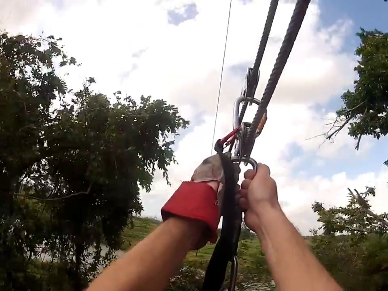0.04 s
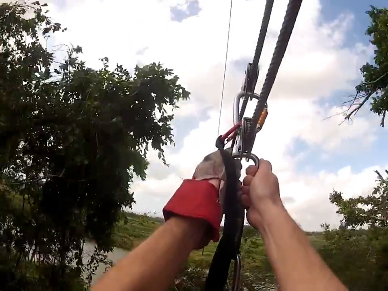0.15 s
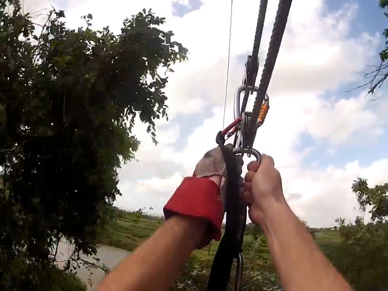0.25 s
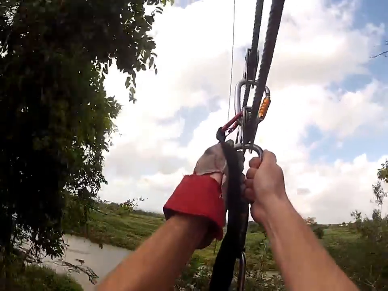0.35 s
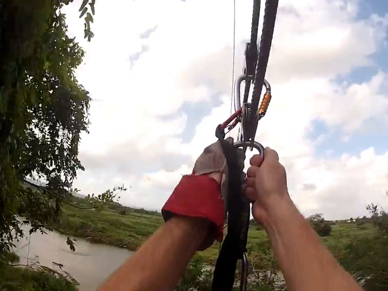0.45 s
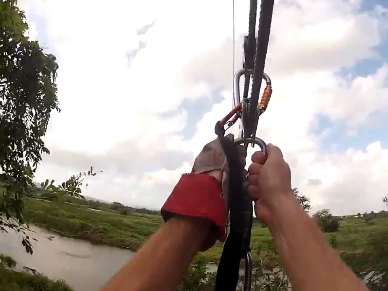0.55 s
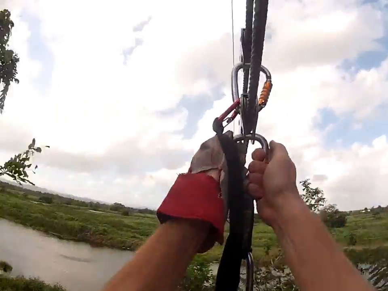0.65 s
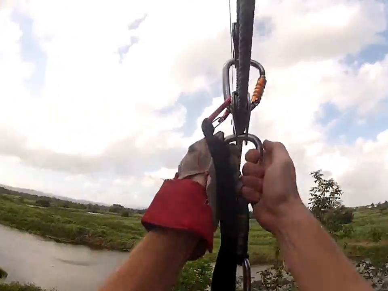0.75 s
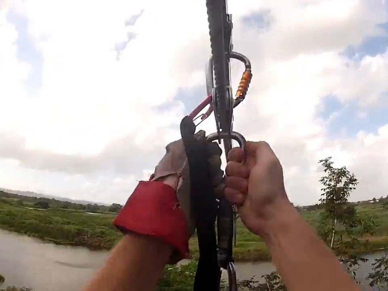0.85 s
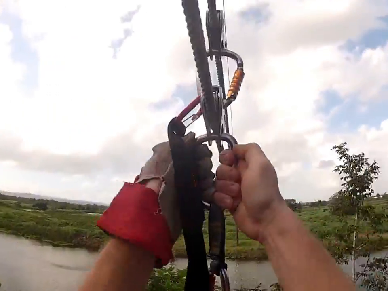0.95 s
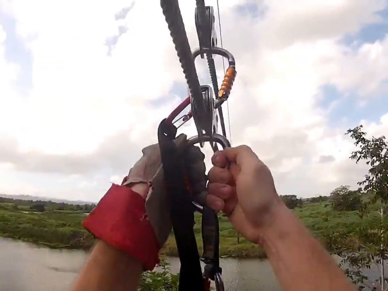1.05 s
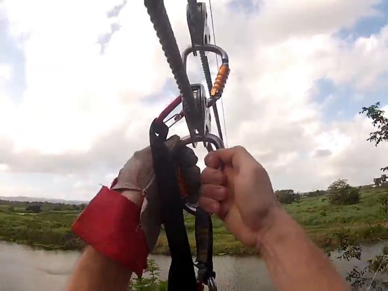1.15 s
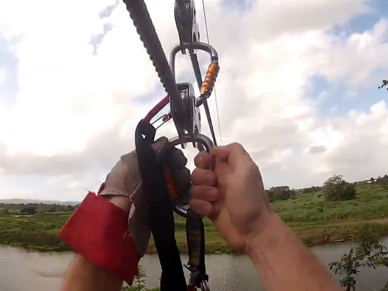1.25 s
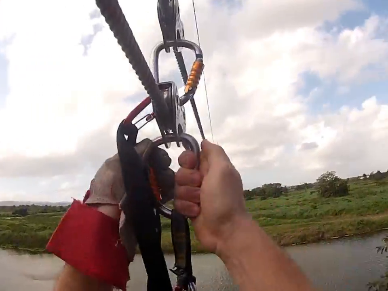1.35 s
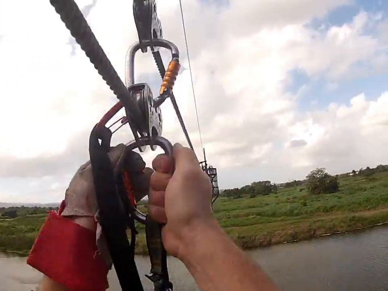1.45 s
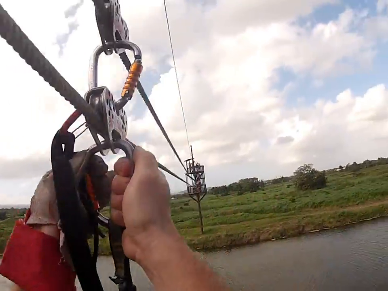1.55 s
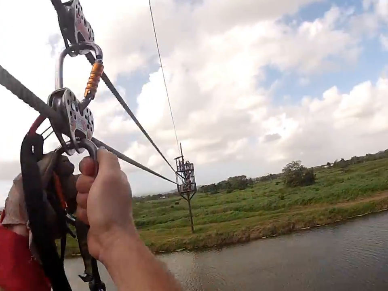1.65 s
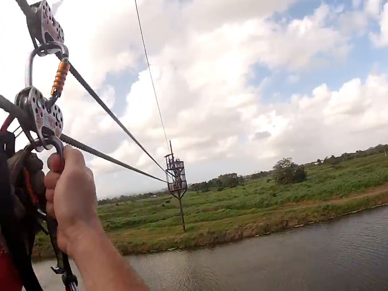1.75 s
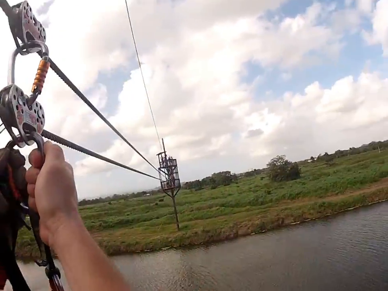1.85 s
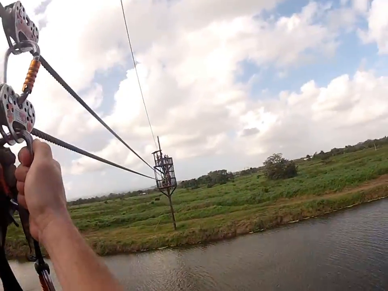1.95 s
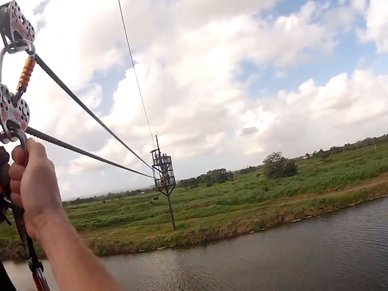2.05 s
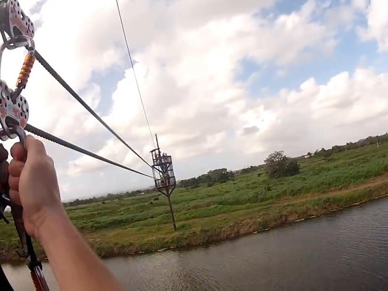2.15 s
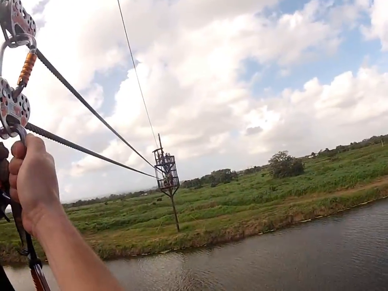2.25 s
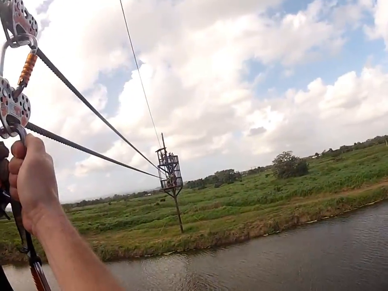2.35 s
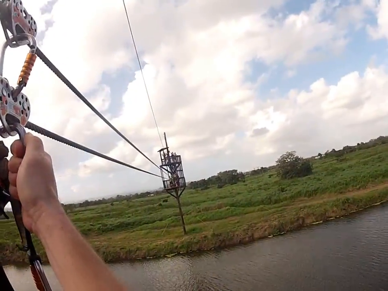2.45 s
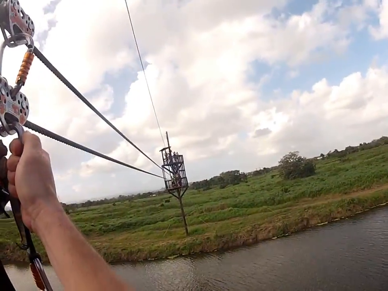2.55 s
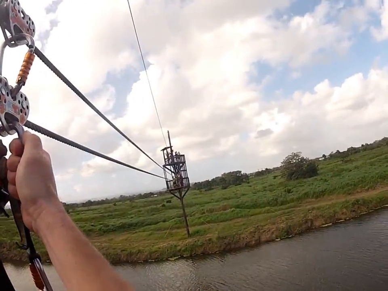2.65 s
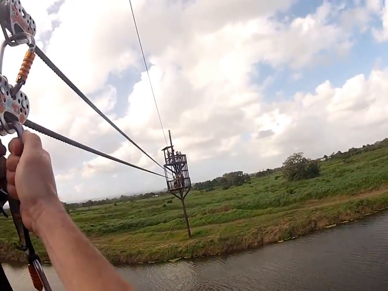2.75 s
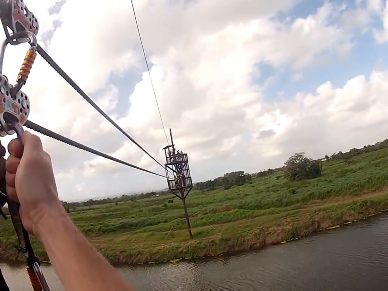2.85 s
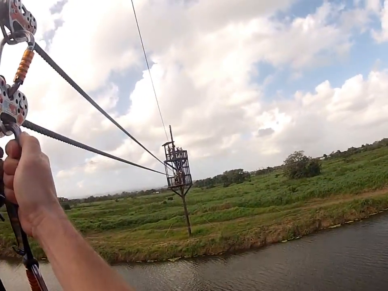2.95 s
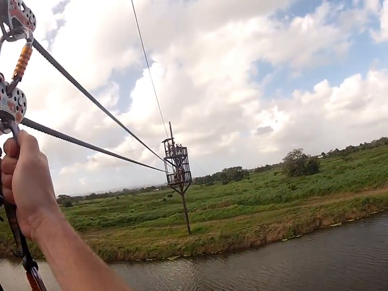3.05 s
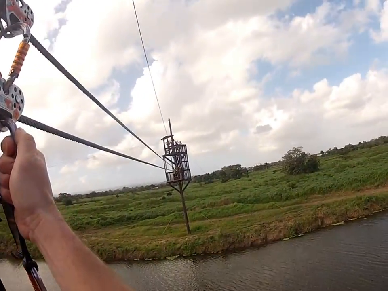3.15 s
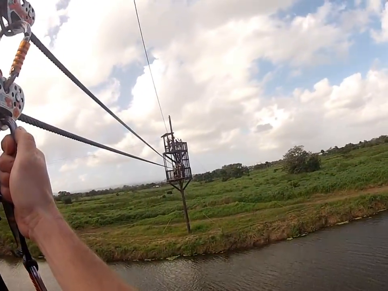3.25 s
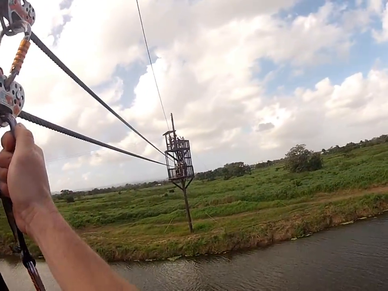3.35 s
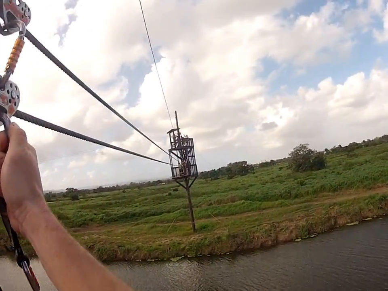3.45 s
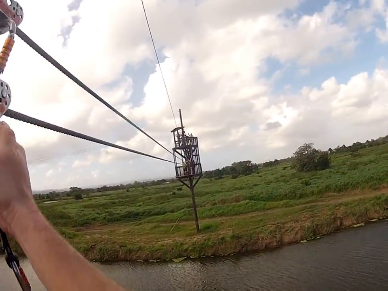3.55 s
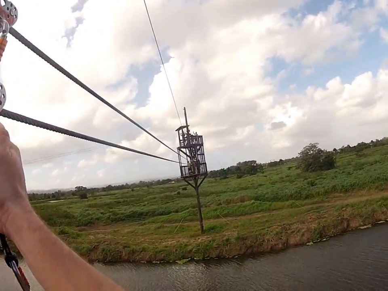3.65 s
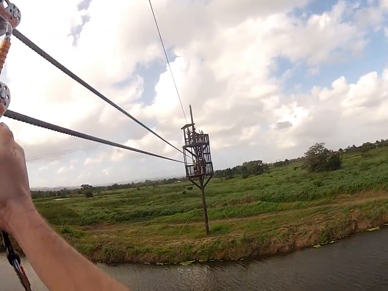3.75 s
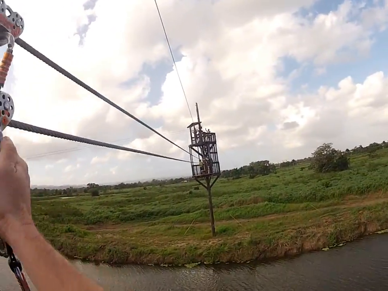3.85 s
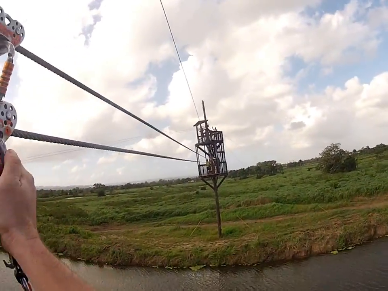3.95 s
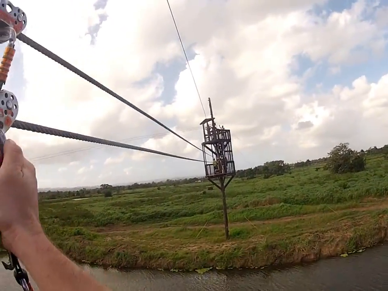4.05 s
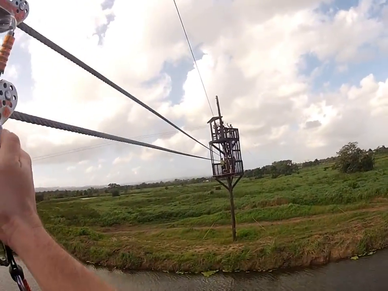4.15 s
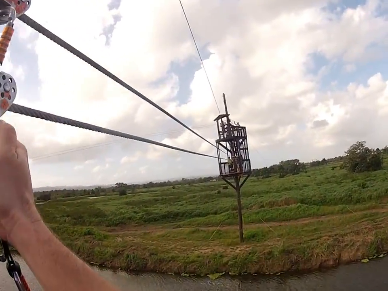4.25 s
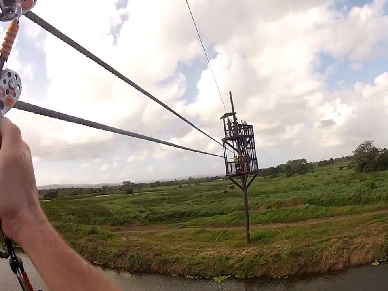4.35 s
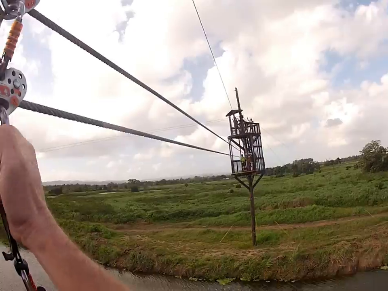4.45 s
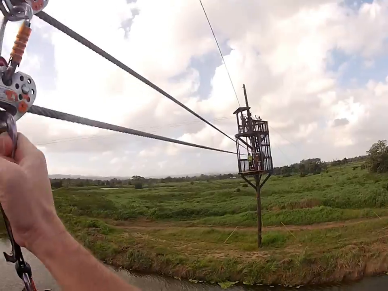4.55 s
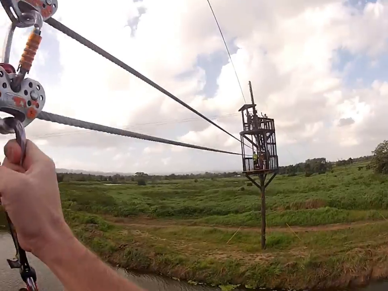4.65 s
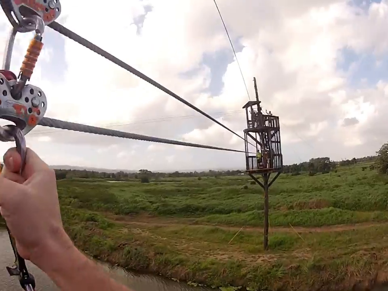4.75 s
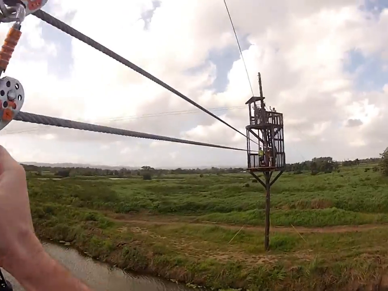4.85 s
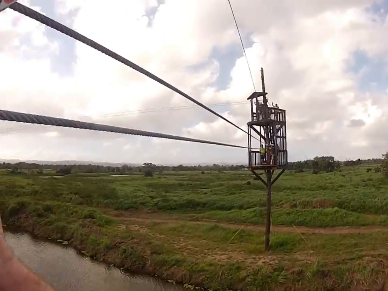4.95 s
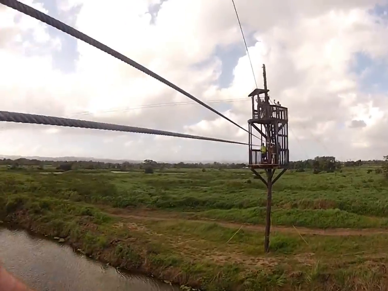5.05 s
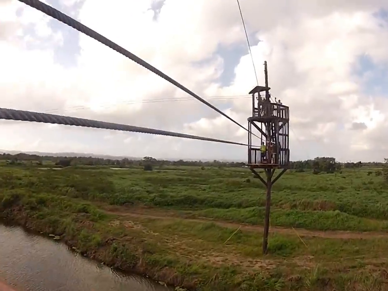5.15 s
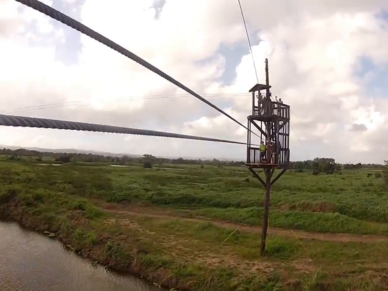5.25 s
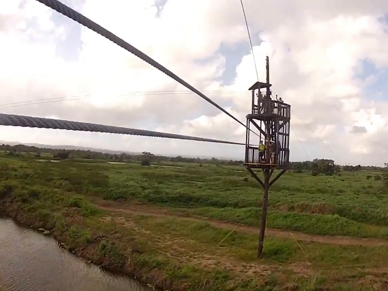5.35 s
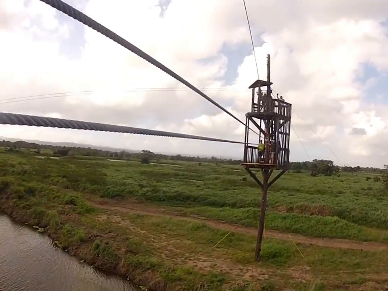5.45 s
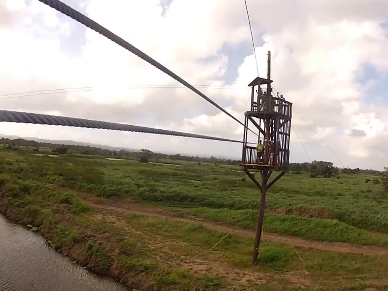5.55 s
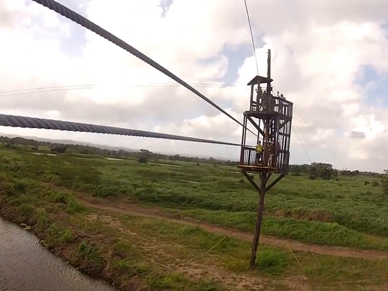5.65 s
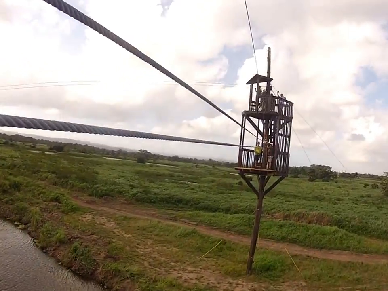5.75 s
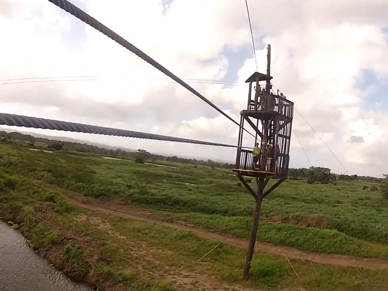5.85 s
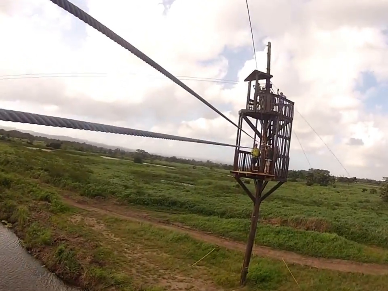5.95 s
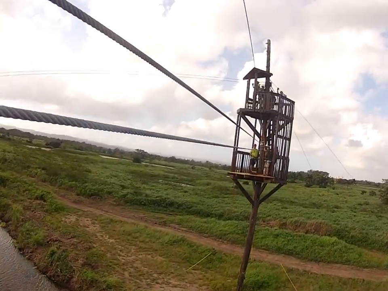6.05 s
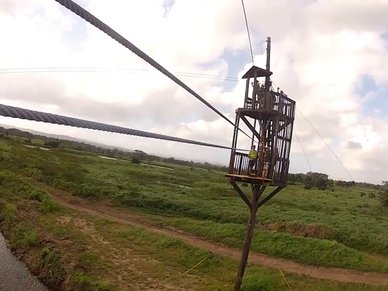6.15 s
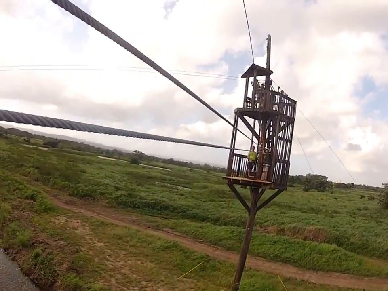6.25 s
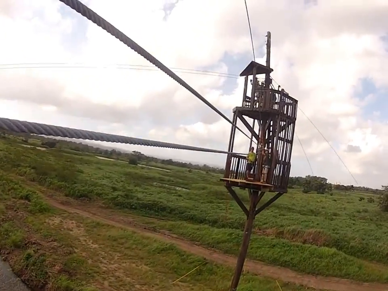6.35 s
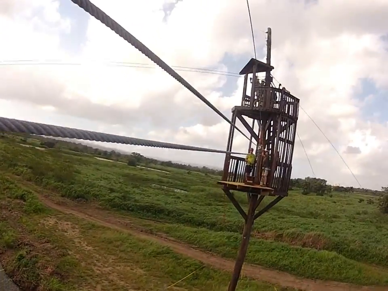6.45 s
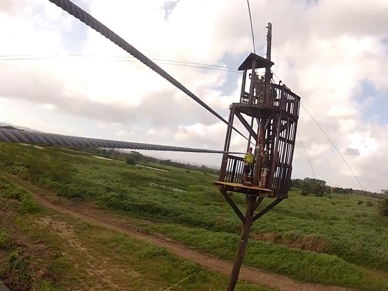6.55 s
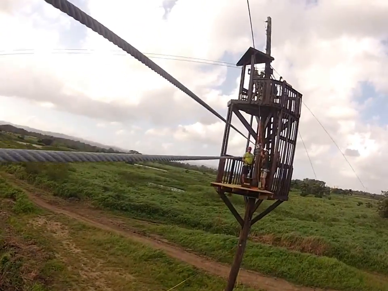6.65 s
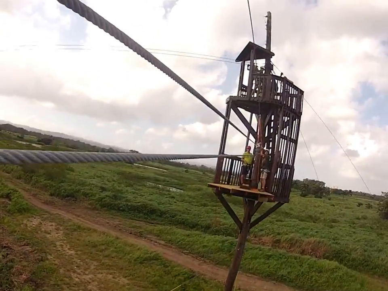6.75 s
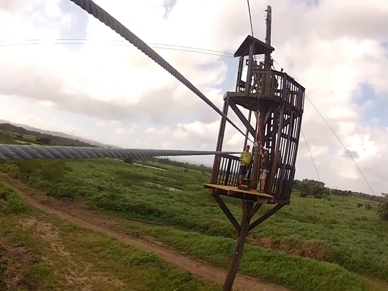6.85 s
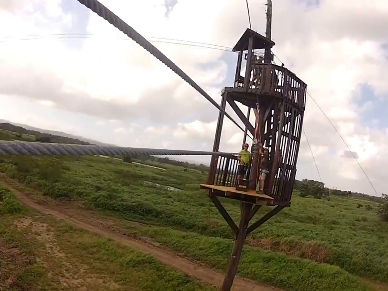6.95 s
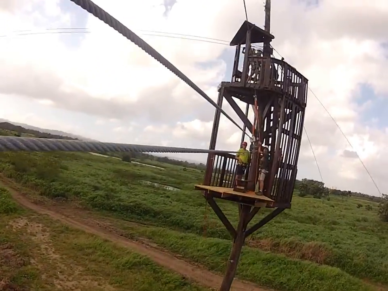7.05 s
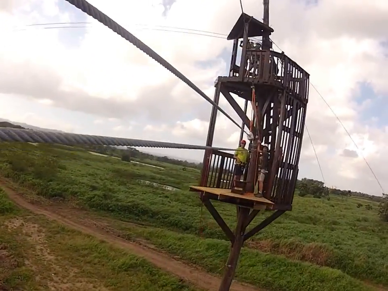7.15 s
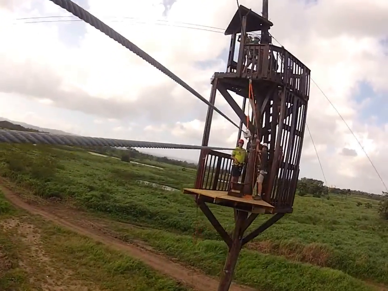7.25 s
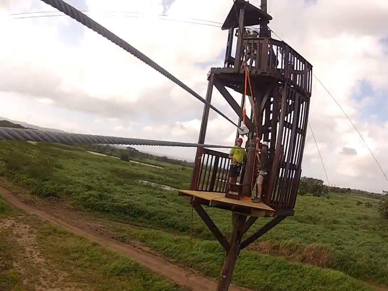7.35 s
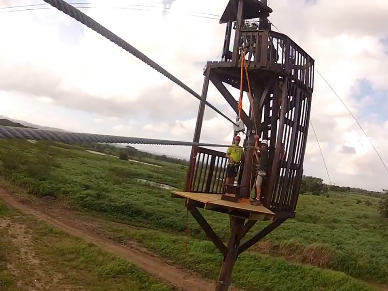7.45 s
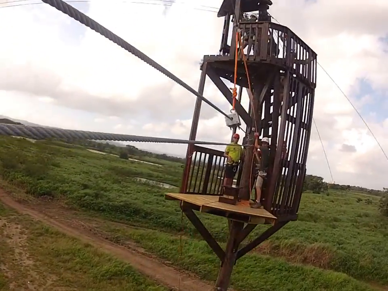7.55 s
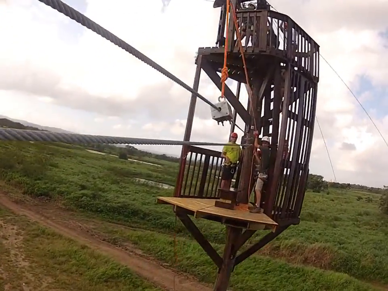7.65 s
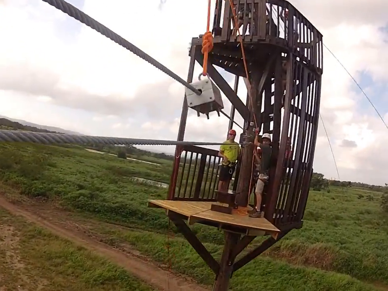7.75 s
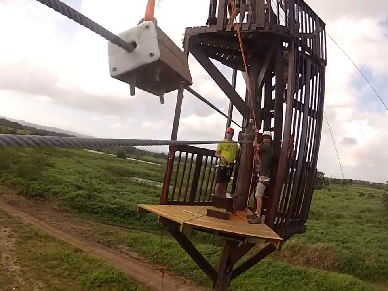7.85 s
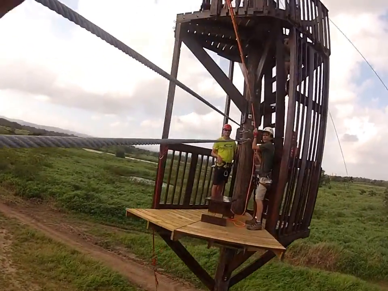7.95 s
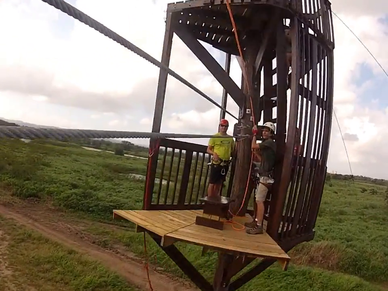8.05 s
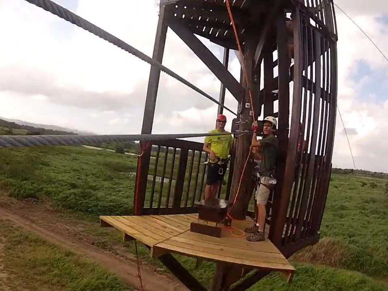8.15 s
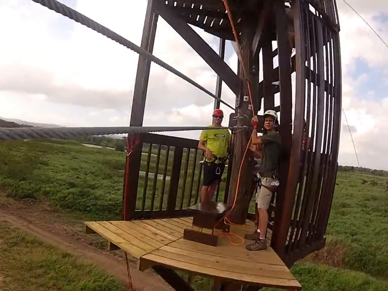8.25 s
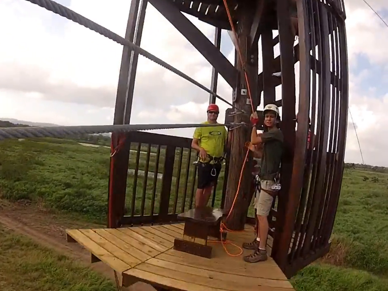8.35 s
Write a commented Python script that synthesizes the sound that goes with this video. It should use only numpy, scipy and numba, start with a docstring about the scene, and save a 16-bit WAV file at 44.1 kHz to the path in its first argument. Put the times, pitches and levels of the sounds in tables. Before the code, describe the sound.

A metal trolley whirs and hisses down a steel cable over a river, wind buffeting dully, then a hard clack near the end.

```python
"""A trolley rolls down a steel cable, heard through the sealed case of a camera on the rider's helmet.
From the start, random wire-on-wheel ticks ring the trolley's resonances and noise gusts buffet the case.
From 4.7 s wheels skip wires and one resonance climbs; from 5 s decaying sines slap the case.
From 6.3 s a faint strand tone sinks; at 8.08 s the brake block clacks and the rolling dips.
Throughout, the camera rides its gain and holds slow samples, which mirrors the sound into the treble."""
import sys
import numpy as np
from scipy import signal
from scipy.fft import rfft, irfft
from scipy.io import wavfile
from scipy.ndimage import uniform_filter1d
from numba import njit

SR = 44100
rng = np.random.default_rng(int(sys.argv[2]) if len(sys.argv) > 2 else 0)


def bounce(signal):
    """Save signal as a 16-bit WAV file at the path given by the first command-line argument."""
    frames = np.transpose(np.atleast_2d(signal))
    limited = np.clip(frames, -1, 1)
    pcm = np.round(limited * 32767).astype(np.int16)
    wavfile.write(sys.argv[1], SR, pcm)


N = 370881


def undb(db):
    """Amplitude gain of a level in dB."""
    return 10 ** (np.asarray(db) / 20)


def unit(x):
    """Scaled to rms 1."""
    return x / np.sqrt(np.mean(x ** 2))


def curves(table):
    """Columns after t/s, interpolated linearly to every sample."""
    t_s, *columns = np.transpose(table)
    return [np.interp(np.arange(N) / SR, t_s, column) for column in columns]


def walk(rate_hz):
    """Random levels held 1 / rate_hz, smoothed by two moving averages of that length; rms 1."""
    hold = int(SR / rate_hz)
    steps = np.repeat(rng.standard_normal(N // hold + 1), hold)
    return unit(uniform_filter1d(uniform_filter1d(steps, hold), hold)[:N])


def resonance(x, f_hz, width_hz):
    """Band-pass applied twice, so that the valleys between resonances stay dark."""
    b, a = signal.iirpeak(f_hz, f_hz / (1.5 * width_hz), SR)  # two passes narrow it to about width_hz
    return signal.lfilter(b, a, signal.lfilter(b, a, x))


def ring(times_s, levels_db, modes, rise_s=0.0011):
    """Every blow rings the same decaying modes, each time at slightly different levels."""
    out, t = np.zeros(N + SR), np.arange(SR // 2) / SR
    chances = rng.standard_normal((len(times_s), len(modes)))
    for start_s, level_db, chance in zip(times_s, levels_db, chances):
        blow = np.zeros(len(t))
        for (f_hz, mode_db, t60_s), c in zip(modes, chance):
            decay = 1000. ** (-t / t60_s)
            blow += undb(mode_db + 0.26 * c) * np.sin(2 * np.pi * f_hz * t) * decay
        start = int(start_s * SR)
        out[start:start + len(t)] += undb(level_db) * blow * (1 - np.exp(-t / rise_s))
    return out[:N]


# rolling before skips and unloading: t/s, level/dB
ROLLING_LEVEL = [(0.0, -24), (0.55, -24), (1.1, -21.5), (1.3, -22), (2.55, -23.5), (3.98, -20), (4.35, -22),
                 (5.08, -20), (5.39, -12), (6.06, -16.5), (6.53, -14), (7.3, -16.5), (8.0, -15.5),
                 (8.3, -19.5), (8.41, -21.5)]
# trolley and case resonances: f/Hz, width/Hz, relative level/dB in head poses 0, 1, 2, 3, 4
TROLLEY_RESONANCES = [(645, 14.7, -20.5, -15, -22.5, -22.5, -42), (912, 140, -24.5, -24, -20.5, -24.5, -32),
                      (1125, 63, -18, -18, -16, -20, -17.5), (1377, 95, -12, -14, -9.5, -17, -15.5),
                      (1544, 125, -11.5, -14.5, -7.5, -13, -9), (1813, 73, -5.5, -5.5, 1, -2.5, -2),
                      (1932, 108, -7, -3.5, 7, 3.5, 6.5), (2122, 132, -2.5, 3.5, 0, -5.5, 5.5),
                      (2344, 107, 5, 7, 4, 8, 11.5), (2530, 107, 5.5, 6, -7.5, 5, 6.5),
                      (2718, 165, 8, 5, 0, 3, 2), (3034, 114, -5, -12, 0, -5.5, -35),
                      (3272, 163, 1, -3, 0.5, -1, -19), (3529, 138, -1, -3.5, 5.5, -3.5, 6.5),
                      (3791, 160, 4.5, 6.5, 11, 2, -7), (4087, 255, 1.5, 2.5, -3, -2.5, -5),
                      (4392, 152, -1.5, 1.5, -10, -1.5, -8), (4765, 264, -6, -3, -1.5, -9.5, -12.5),
                      (5030, 220, -16, -14, -7, -36, -17.5), (5316, 234, -17, -7.5, -4.5, -12.5, -14),
                      (5596, 208, -2, -2.5, -5.5, -11.5, -11), (5850, 280, -24, -11, -11, -18.5, -23)]
# head: t/s, pose [0 up at the trolley, 1 turning away, 2 side on, 3 turning ahead, 4 down the cable]
HEAD_POSE = [(0, 0), (.7, .2), (1.1, 1), (1.6, 1.1), (1.85, 1.9), (3.0, 2), (3.3, 2.2), (4.6, 2.2),
             (5.15, 3), (6.2, 3.2), (6.7, 4), (8.41, 4)]


def trolley(tick_rate_hz=3500., scatter_db=1.5):
    """Wires tick over the wheels at random; head pose sets how strongly each resonance is heard."""
    pose = curves(HEAD_POSE)[0]
    struck = rng.random(N) < tick_rate_hz / SR
    ticks = struck * undb(scatter_db * rng.exponential(size=N)) * rng.standard_normal(N)
    rolling = climbing(ticks)
    for f_hz, width_hz, *pose_db in TROLLEY_RESONANCES:
        own = np.roll(ticks, rng.integers(N))  # each part picks up ticks of its own
        level_db = np.interp(pose, np.arange(len(pose_db)), pose_db)
        level_db = level_db + 0.15 * walk(2.24) + 0.72 * walk(25)
        rolling = rolling + undb(level_db) * resonance(own, f_hz, width_hz)
    loudness = np.sqrt(uniform_filter1d(rolling ** 2, SR // 2))  # rms over 0.5 s
    return rolling / loudness * undb(curves(ROLLING_LEVEL)[0] + skipping() + unloading())


# a wheel skips a wire: t/s, swell level/dB before smoothing
WHEEL_SKIPS = [(4.676, 7), (5.603, 6.5), (5.674, 8), (6.055, 7), (6.244, 5), (6.38, 6.5), (6.445, 4),
               (6.561, 7), (6.721, 6), (7.029, 5.5), (7.093, 3), (7.194, 6.5), (7.364, 3), (7.437, 6),
               (7.551, 3), (7.972, 7), (8.355, 5)]


def skipping(rate_hz=37.0, small_db=1.0, swell_s=0.0057):
    """Level in dB that builds up to every skip and breaks off; small skips come at random."""
    peaks = (rng.random(N) < rate_hz / SR) * small_db * rng.random(N)
    for t_s, swell_db in WHEEL_SKIPS:
        peaks[int(t_s * SR)] = swell_db
    # a decay run backwards in time is a build-up
    swell = signal.lfilter([1], [1, -np.exp(-1 / (swell_s * SR))], peaks[::-1])[::-1]
    smoother = np.hanning(SR // 400)
    return np.convolve(swell, smoother / smoother.sum(), "same")


def air(spectrum):
    """Spectrum of white noise coloured by f/Hz, level/dB points."""
    f_hz, level_db = np.transpose(spectrum)
    log_hz = np.log(np.fft.rfftfreq(N, 1 / SR) + 1)
    return rfft(rng.standard_normal(N)) * undb(np.interp(log_hz, np.log(f_hz), level_db))


# wind between gusts: t/s, level/dB
WIND_LEVEL = [(0.0, -38.5), (0.13, -48.5), (0.91, -44), (1.2, -37.5), (2.5, -38), (2.8, -32), (4.2, -30),
              (4.6, -33.5), (4.8, -25.5), (5.69, -25.5), (5.98, -36), (6.7, -36.5), (7.16, -44.5),
              (8.1, -41.5), (8.2, -34), (8.3, -29), (8.41, -48)]
# gust crests: t/s, swell level/dB
GUST_CRESTS = [(1.25, 0.5), (1.49, 3.5), (1.77, 4), (2.02, 2), (2.33, 1), (2.7, 4.5), (3.06, 6), (3.63, 2),
               (3.92, 8), (4.49, 4), (4.72, 3.5), (4.9, 5.5), (5.03, 7.5), (5.19, 4.5), (5.43, 2),
               (5.57, 3.5), (5.7, 1.5), (5.92, 7), (6.6, 8), (6.67, 4), (6.91, 2.5), (7.23, 5)]


def gusting(rise_s=0.036, fall_s=0.032, waver_db=1):
    """Wind level in dB: slow trend, rounded swell at every gust, random waver."""
    t, level_db = np.arange(N) / SR, curves(WIND_LEVEL)[0] + waver_db * walk(9)
    for crest_s, swell_db in GUST_CRESTS:
        width_s = np.where(t < crest_s, rise_s, fall_s)
        level_db = level_db + swell_db * np.exp(-((t - crest_s) / width_s) ** 2)
    return level_db


# gust noise: f/Hz, relative spectral level/dB per Hz
BUFFET_SPECTRUM = [(12, -41), (20, -30.5), (38, -2), (59, 2.5), (231, -17), (289, -15.5), (357, -25),
                   (524, -39), (624, -31), (731, -40), (855, -31.5), (1020, -45), (1300, -33.5),
                   (1690, -44), (2860, -120)]
# light air between gusts: f/Hz, relative spectral level/dB per Hz
CALM_SPECTRUM = [(12, -38), (20, -9), (54, 1), (114, -40), (335, -24.5), (381, -23.5), (755, -30),
                 (900, -46), (1170, -49), (1980, -120)]
CALM_DB = -50
VENT_HZ, VENT_WIDTH_HZ, VENT_T60_S = 50.7, 19.4, 0.33


def wind():
    """Eddies buffet the case in bursts, the upper part hardest; the lowest part booms in its vent."""
    eddies = air(BUFFET_SPECTRUM)
    # crossover from low to upper part over the octave above 60 Hz
    upper = np.clip(np.log2((np.fft.rfftfreq(N, 1 / SR) + 1) / 60.), 0, 1)
    burst = walk(11)
    low, high = irfft(eddies * (1 - upper), N), irfft(eddies * upper, N)
    low = 0.67 * low + 1.04 * resonance(low, VENT_HZ, VENT_WIDTH_HZ)
    low = low * undb(0.31 * burst)
    high = high * undb(0.85 * burst + 2.4 * walk(40) + 1.0)
    gusts = unit(low + high) * undb(gusting())
    return gusts + undb(CALM_DB) * unit(irfft(air(CALM_SPECTRUM), N))


# resonance climbing as the head turns ahead: t/s, f/Hz, level/dB on the scale of TROLLEY_RESONANCES
CLIMBING_RESONANCE = [(4.7, 3240, -30), (5.05, 3260, 2), (5.4, 3320, 5), (5.9, 3430, 5), (6.3, 3520, 5),
                      (6.7, 3530, -6), (7.0, 3530, -30)]


def climbing(ticks, width_hz=103.0):
    """Band-pass with a moving centre: shift down, smooth, shift back."""
    f_hz, level_db = curves(CLIMBING_RESONANCE)
    spin = np.exp(2j * np.pi * np.cumsum(f_hz) / SR)
    lowpass = signal.butter(2, width_hz / 2, fs=SR, output="sos")
    smooth = signal.sosfilt(lowpass, ticks / spin)
    return 2 * undb(level_db) * np.real(smooth * spin)


# gust slaps: t/s, suction level/dB, then relative to it: vent boom level/dB, lid ring level/dB
CASE_SLAPS = [(4.996, -22, -9, -7), (5.012, -18.5, 7, -11), (5.173, -26, -10, -6), (5.466, -23, -11, -8),
              (6.571, -24.5, -8, 2), (6.658, -15.5, 1, -0.5), (8.166, -39, -6, -6), (8.224, -27, 4, -37),
              (8.2334, -12.5, 2.5, -8), (8.245, -15.5, -14, -27), (8.258, -10, -7, -9),
              (8.2619, -3.5, -8, -38), (8.271, -13, -23, -0.5), (8.369, -30, 5, -8)]
# case modes: f/Hz, relative level/dB, t60/s
CASE_MODES = [(127, 10.5, 0.015), (249, -6, 0.04)]
# lid modes: f/Hz, relative level/dB, t60/s
LID_MODES = [(670, -14.5, 0.05), (914, 7, 0.015)]


def slaps():
    """A slap sucks at the case, sets the vent booming and rings the lid."""
    t_s, suction_db, boom_db, lid_db = np.transpose(CASE_SLAPS)
    lid = ring(t_s, suction_db + lid_db, LID_MODES)
    case = ring(t_s, suction_db, CASE_MODES)
    vent = ring(t_s, suction_db + boom_db, [(VENT_HZ, 0, VENT_T60_S)])
    return lid - case - vent


def strands(from_s=6.3, to_s=8.08, fade_s=.15, start_hz=480, sag_hz_per_s=60, level_db=-61):
    """Faint, wavering tone of strands passing under the wheels, sinking as the ride slows."""
    t = np.arange(N) / SR
    f_hz = (start_hz - sag_hz_per_s * (t - from_s)) * (1 + .018 * walk(40))
    fade = np.clip(np.minimum(t - from_s, to_s - t) / fade_s, 0, 1)
    return fade * undb(level_db + 4.0 * walk(14)) * np.sin(2 * np.pi * np.cumsum(f_hz) / SR)


# blows on the brake block: t/s, level/dB
BRAKE_BLOWS = [(8.0768, 6.5), (8.0792, 5)]
# block modes: f/Hz, relative level/dB, t60/s
BLOCK_MODES = [(220, -20, .012), (600, -20, .007), (950, -20, .006), (1290, -14, .008), (1650, -11, .006),
               (1950, 0, .0095), (2420, -6, .007), (3100, -12, .006), (4010, -10, .006), (5200, -11, .005)]


def brake():
    """Blows on the brake block ring its short, fast-rising modes."""
    return ring(*np.transpose(BRAKE_BLOWS), BLOCK_MODES, rise_s=.0004)


def unloading(dip_db=-6, fall_s=.012, return_s=.06):
    """The first blow on the block unloads the wheels for a moment: rolling dips toward dip_db."""
    since_s = np.maximum(np.arange(N) / SR - BRAKE_BLOWS[0][0], 0)
    return dip_db * (1 - np.exp(-since_s / fall_s)) * np.exp(-(since_s / return_s) ** 2)


def scene():
    """All sources reach one microphone."""
    mono = trolley() + wind() + slaps() + strands() + brake()
    return np.array([mono, mono])


@njit
def ride(x, sensed, top, drop, release, lag):
    """Gain control: gain falls, lag samples late, while a peak exceeds top, and creeps back after."""
    y, cut = np.empty(len(x)), np.zeros(len(x) + 1)  # cut in nepers
    for i in range(len(x)):
        gain = np.exp(-cut[max(i - lag, 0)])
        y[i] = x[i] * gain
        cut[i + 1] = cut[i] + (drop if abs(sensed[i]) * gain > top else -release * cut[i])
    return y


def record(dry, sense_hz=500., bass_cut_hz=28, clip_level=.85, top_hz=15330):
    """Treble-sensing gain control, bass cut, soft clip, held 12 kHz samples, steep top cut."""
    sensed = signal.sosfilt(signal.butter(1, sense_hz, "high", fs=SR, output="sos"), dry[0])
    mono = ride(dry[0], sensed, top=.46, drop=.016, release=4.5e-4, lag=int(.004 * SR))
    mono = signal.sosfilt(signal.butter(2, bass_cut_hz, "high", fs=SR, output="sos"), mono)
    mono = clip_level * np.tanh(mono / clip_level)  # input stage rounds the highest peaks
    antialias = signal.firwin(147 * 60 + 1, 1.03 / 147)
    slow = signal.resample_poly(mono, 40, 147, window=antialias)  # 12 kHz
    held = np.repeat(slow, 4)  # 48 kHz; the steps mirror the sound into the treble
    held = signal.resample_poly(held, 147, 160)[:N]  # back to SR
    held = signal.sosfilt(signal.ellip(10, .2, 80, top_hz, fs=SR, output="sos"), held)
    return np.array([held, held])


dry = scene()
out = record(dry)
bounce(out)
```